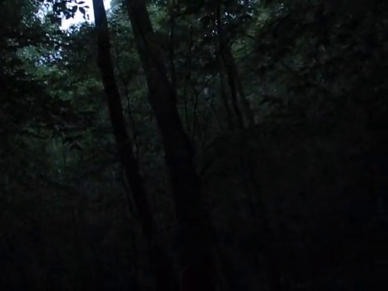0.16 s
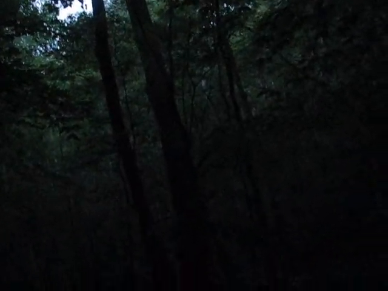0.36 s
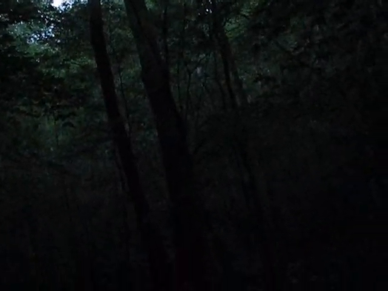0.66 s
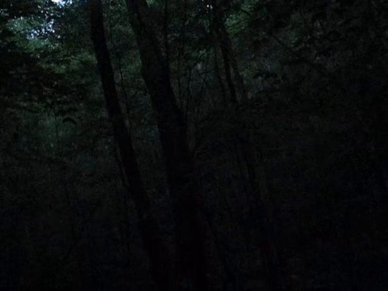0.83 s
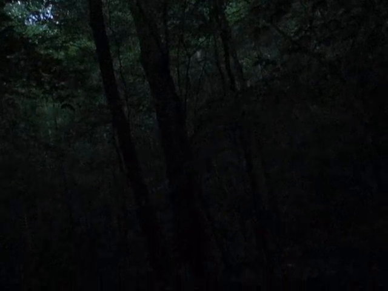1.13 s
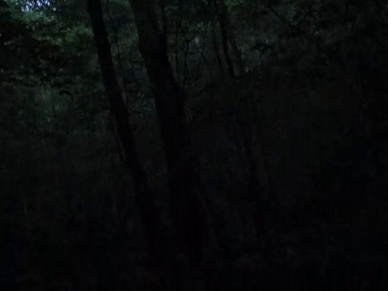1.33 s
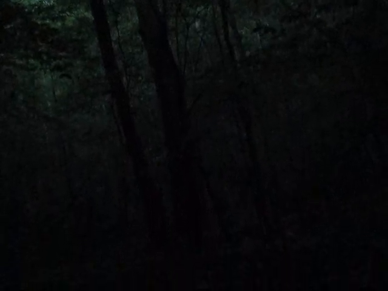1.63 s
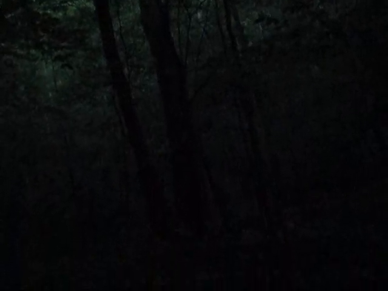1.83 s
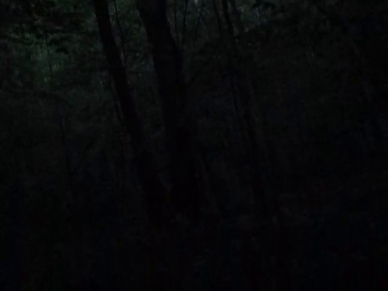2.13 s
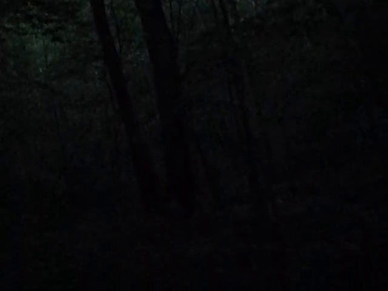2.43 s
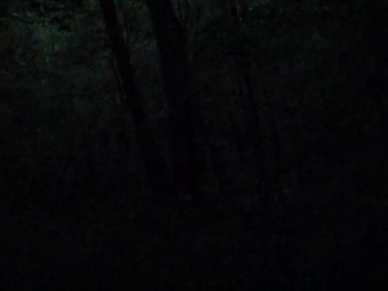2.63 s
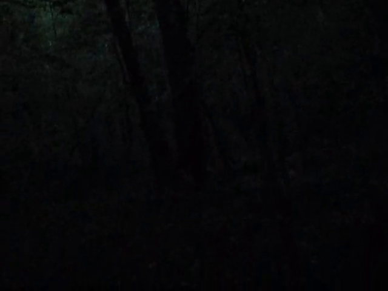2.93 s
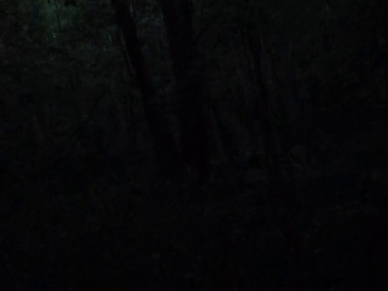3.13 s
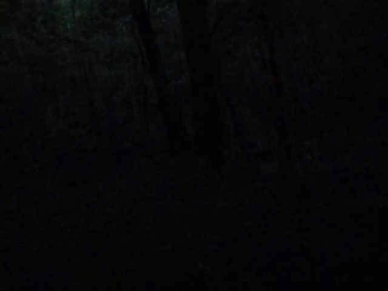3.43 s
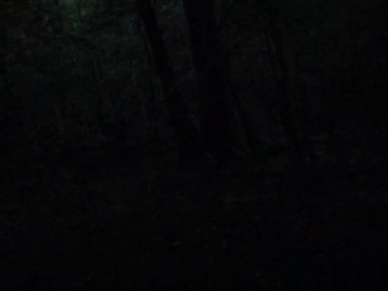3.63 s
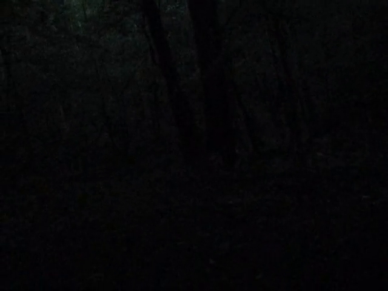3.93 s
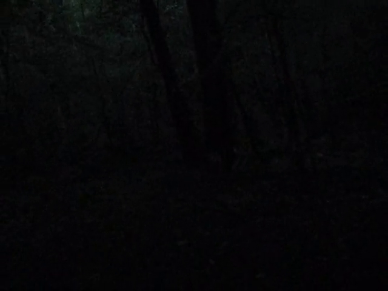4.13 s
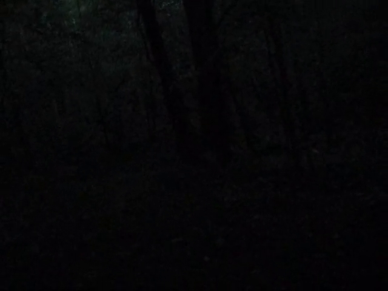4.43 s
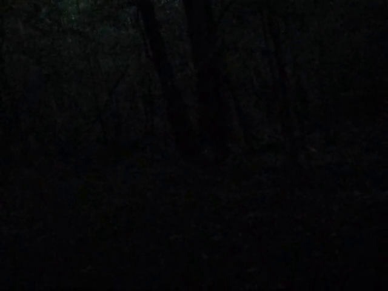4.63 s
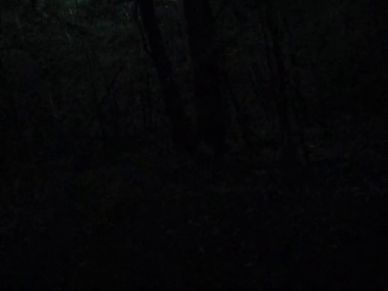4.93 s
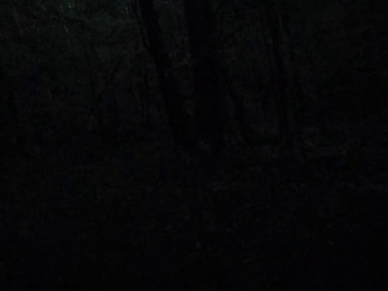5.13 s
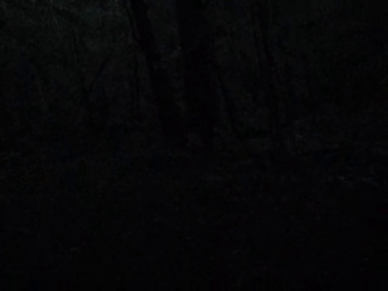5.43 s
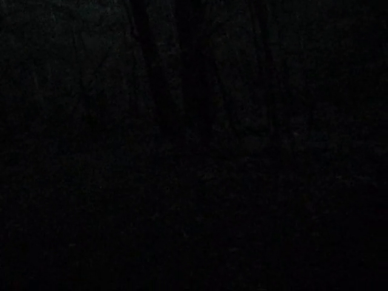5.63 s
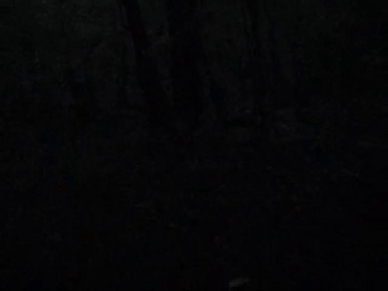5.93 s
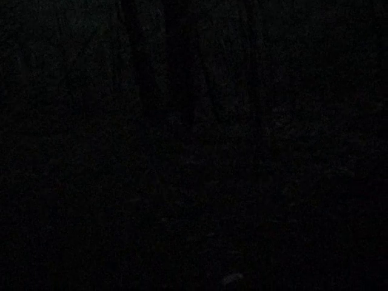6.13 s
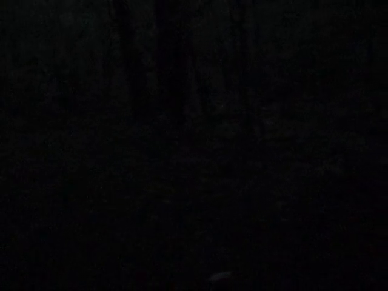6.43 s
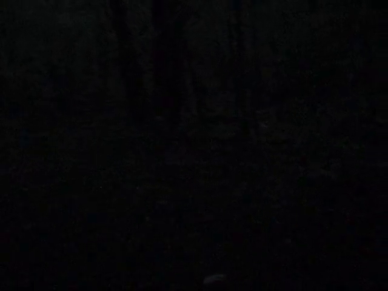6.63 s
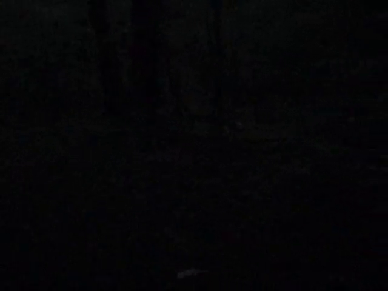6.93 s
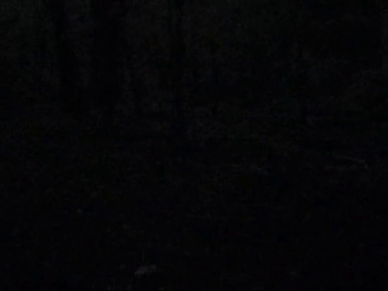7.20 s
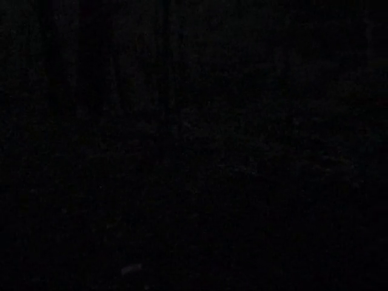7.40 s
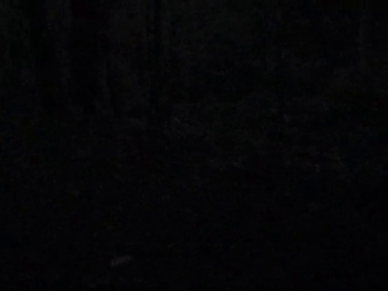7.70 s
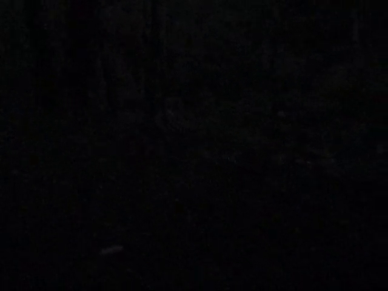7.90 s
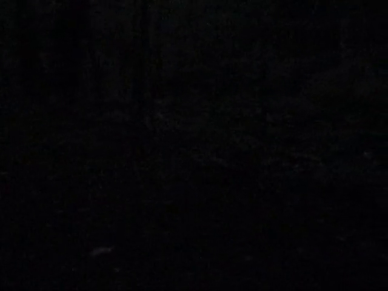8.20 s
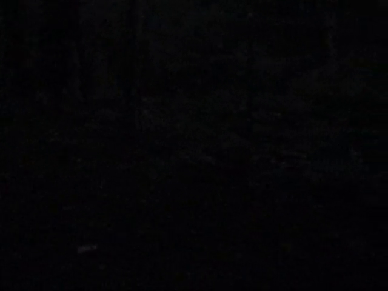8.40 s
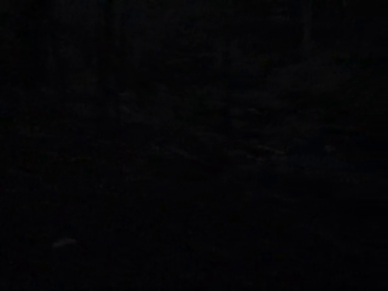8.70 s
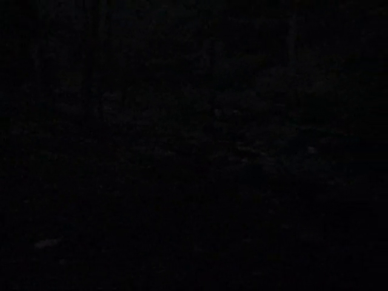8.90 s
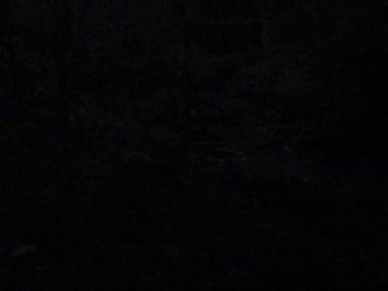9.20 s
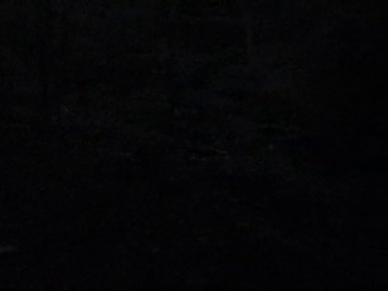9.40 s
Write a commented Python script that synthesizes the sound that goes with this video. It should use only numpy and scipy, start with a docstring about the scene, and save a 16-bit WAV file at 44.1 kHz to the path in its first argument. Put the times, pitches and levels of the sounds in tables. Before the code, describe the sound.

A steady, soft brook hiss fills a dark forest. Nearby, a clear whistling bird and a rougher, burry one exchange very short gliding phrases, smeared by long woodland echoes. A faint high whistle comes from a distant bird. Low gurgles and a few bubble plops surface in the water; leaves crackle briefly later on. The stereo microphone adds a faint steady whine and dull extreme treble.

```python
"""Dawn forest beside a brook

A clear whistler and a burry singer, gliding sines with and without a warble, trade short phrases
that smear among the trunks; a thin far bird whistles above them. The brook rushes as smooth noise
and gurgles as ringing air pockets, leaves rustle in bursts of crackly noise, and a thin, wandering
narrow band of high hiss lies to the left. The microphone electronics add a faint whine of steady sines."""
import sys
import numpy as np
from scipy import signal
from scipy.fft import rfft, irfft, next_fast_len
from scipy.io import wavfile
from scipy.ndimage import uniform_filter1d

SR = 44100
rng = np.random.default_rng(int(sys.argv[2]) if len(sys.argv) > 2 else 0)


def wrap_up_sound(samples):
    """Save the sound to the file named by the first command line argument, as 16-bit audio."""
    columns = np.atleast_2d(samples).T
    # keep every value between -1 and 1, then stretch to whole-number steps
    tamed = np.clip(columns, -1, 1)
    steps = np.round(tamed * 32767).astype(np.int16)
    wavfile.write(sys.argv[1], SR, steps)


N = 421155
TIME = np.arange(N) / SR
PADDED = next_fast_len(N + 2 * SR)  # room for two seconds of echo
BINS_HZ = np.fft.rfftfreq(PADDED, 1 / SR)
PORT_LAG_S = 5.5e-5  # sound reaches the left port this much later than the right

# The near singers carry best in mid range. Each row: frequency in Hz, gain in dB.
THROAT = [(2000, -0.5), (2500, -2.2), (3000, 2.2), (3500, -0.75), (4300, -1)]
# Air pockets under stones in the brook. Each row: pitch in Hz, relative level in dB, t60 in seconds.
AIR_POCKETS = [(323.4, -10, 0.22), (351, -1.5, 0.08), (392.5, -1.5, 0.12), (470.6, -8.5, 0.17)]


def from_db(db):
    """Decibels to gain."""
    return 10 ** (np.asarray(db) / 20)


def rms_one(x):
    """Scale to unit rms."""
    return x / np.sqrt(np.mean(x ** 2) + 1e-20)


def at_hz(points, hz):
    """Columns of a table read on a log-frequency axis."""
    first, *columns = np.transpose(points)
    log_hz = np.log(np.maximum(hz, 1))
    return [np.interp(log_hz, np.log(first), column) for column in columns]


def over_time(points):
    """A table of seconds and values, read at every sample."""
    return np.interp(TIME, *np.transpose(points))


def drift(corner_hz):
    """Slow random wander of unit rms: noise through two equal low-pass poles, at every 40th sample."""
    r = np.exp(-2 * np.pi * corner_hz * 40 / SR)
    noise = rng.standard_normal(N // 40 + 2002)
    slow = signal.lfilter([1], [1, -2 * r, r * r], noise)[2000:]  # skip the filter's start
    return np.interp(np.arange(N) / 40, np.arange(len(slow)), rms_one(slow))


def band(x, order, low_hz, high_hz):
    """Keep what lies between two frequencies."""
    return signal.sosfilt(signal.butter(order, [low_hz, high_hz], "band", fs=SR, output="sos"), x)


def at_ports(x, pan_db):
    """A source heard at both ports: left minus right level in dB, and a small lag at the left."""
    lagged = np.interp(TIME - PORT_LAG_S, TIME, x)
    return np.array([lagged, x]) * from_db([[pan_db / 2], [-pan_db / 2]])


def sing(notes, throat, arch_db, edge_s, waver_hz):
    """Each syllable is a sine on a smooth pitch contour, arched in level; swing columns warble it.

    Gives the direct and the scattered share; the ends lie arch_db under the middle.
    """
    warble_per_s, warble_slip_rad = 76, .9  # the warble keeps uneven time
    out = np.zeros((2, N))
    waver = waver_hz * drift(43.5)
    slip = warble_slip_rad * drift(24.95)
    for start, to_turn, after, first_hz, turn_hz, last_hz, level_db, growth_db, facing_db, *swing in notes:
        turn, end = start + to_turn, start + to_turn + after
        span = slice(int(start * SR), int(end * SR) + 1)
        t, corners = TIME[span], [start, turn, end]
        glide = uniform_filter1d(np.interp(t, corners, [first_hz, turn_hz, last_hz]), size=300)
        pitch = glide + waver[span]
        if swing:
            warble = np.sin(2 * np.pi * warble_per_s * (t - start) + slip[span])
            pitch += np.interp(t, corners, swing) * warble
        way = 2 * (t - start) / (end - start) - 1  # -1 at the start, 1 at the end
        db = level_db + growth_db * way / 2 - arch_db * way ** 2 + at_hz(throat, glide)[0]
        edges = np.clip(np.minimum(t - start, end - t) / edge_s, 0, 1)
        note = np.sqrt(2) * from_db(db) * edges * np.sin(2 * np.pi * np.cumsum(pitch) / SR)
        out[:, span] += note * [[from_db(facing_db)], [1]]
    return out


def in_woods(song, pan_db, near_t60, near_db, far_t60, far_db, alike):
    """Direct sound plus countless echoes from near and far trunks: dying noise as impulse response.

    The t60s are in seconds; alike is the share of echo power common to left and right.
    """
    # Leaves and twigs scatter high notes better. Each row: frequency in Hz, echo gain in dB.
    scatter = [(2000, -5), (2600, 0.5), (3200, -0.4), (4200, 1.9)]
    leaf_stir, leaf_stir_hz = .35, 60  # moving leaves make the echoes flutter: depth, rate
    build_s = .005  # first echoes arrive within milliseconds
    t = TIME[:2 * SR]
    near = from_db(-60 * t / near_t60) ** 2
    far = from_db(-60 * t / far_t60) ** 2
    power = from_db(2 * near_db) * near / np.sum(near) + from_db(2 * far_db) * far / np.sum(far)
    envelope = np.sqrt(power) * (1 - np.exp(-t / build_s))
    shared, left, right = rng.standard_normal((3, len(t))) * envelope
    echoes = np.sqrt(alike) * shared + np.sqrt(1 - alike) * np.array([left, right])
    direct, scattered = song
    scattered = scattered * rms_one(1 + leaf_stir * drift(leaf_stir_hz))
    colour = from_db(at_hz(scatter, BINS_HZ))
    wet = rfft(at_ports(scattered, pan_db), PADDED) * rfft(echoes, PADDED) * colour
    return at_ports(direct, pan_db) + irfft(wet, PADDED)[:, :N]


def clear_singer():
    """Pure whistled syllables gliding to a turning pitch and on to a last one."""
    # Each row: start in seconds, seconds to the turn, seconds after it, first, turn and last pitch in Hz,
    # mid-syllable rms level in dB before the throat, growth over the syllable in dB,
    # facing (direct over scattered share) in dB.
    notes = [ (.735, 0.047, 0.0056, 3500, 4380, 4350, -51, 5, 1),
             (.783, 0.0078, 0.013, 4350, 3596, 3060, -35.5, 0, -0.5),
             (1.272, 0.069, 0.027, 2410, 3142, 2780, -37, 6, 0),
             (1.375, 0.041, 0.061, 2750, 2330, 2895, -45, -2.5, -2),
             (1.89, .05, .045, 2000, 2250, 3010, -49.5, 15, -2),
             (1.985, 0.024, 0.028, 3100, 2877, 2810, -37.5, -13, -2),
             (2.06, 0.031, 0.025, 2930, 2380, 2090, -42.5, -15, 2),
             (2.495, 0.031, 0.047, 3080, 2697, 2056, -39.5, -8.5, -1),
             (2.6, 0.043, 0.077, 3260, 2676, 1987, -40.5, -5, -3),
             (3.335, 0.018, 0.019, 2603, 2427, 2170, -41.5, 7, -1),
             (3.385, .018, 0.036, 2356, 2390, 2385, -41, 9, 0.5),
             (3.436, 0.027, 0.022, 2566, 2810, 3000, -41.5, -4, 1.5),
             (3.752, 0.015, 0.034, 3012, 3010, 2856, -38.5, -3, 4.5),
             (3.797, 0.029, 0.014, 2900, 3680, 3280, -44, 3, 5),
             (3.85, .021, 0.054, 3335, 3075, 2933, -41, -7, 5.5),
             (3.99, 0.051, 0.066, 2800, 2544, 2020, -45, 2, -4.5),
             (4.503, 0.034, 0.058, 3045, 2977, 3163, -40, 9, 4),
             (4.6, .03, 0.033, 3190, 3166, 2610, -37, 0, 0),
             (4.665, .035, 0.048, 2640, 2436, 2210, -42.5, -10, 1.5),
             (5.3, .035, 0.023, 2730, 2513, 2180, -41.5, -3, 0),
             (5.305, .035, 0.031, 3100, 3310, 3660, -47, 6, -3),
             (5.37, 0.018, 0.045, 3150, 3453, 2494, -37, 6, 1.7),
             (6.725, .075, 0.047, 3360, 2870, 2756, -46, -4, -6),
             (6.875, .03, 0.039, 3240, 2850, 2080, -39, -2.5, 0),
             (7.42, 0.027, 0.024, 3398, 3136, 3110, -51, 12, 3),
             (7.48, 0.011, .015, 3570, 4050, 3420, -52, 7, -5),
             (7.506, 0.017, 0.035, 3490, 3020, 2090, -48.5, -24, 1.5),
             (7.6, 0.046, 0.12, 3060, 3095, 3050, -57.5, -6, 7),
             (8.225, 0.041, 0.024, 2604, 2967, 3050, -46.5, 14, -3),
             (8.3, 0.043, .04, 2990, 3032, 3016, -49, 3, 5),
             (8.39, 0.026, .11, 2973, 3066, 3060, -61, -9, 8),
             (8.885, 0.018, .025, 3450, 3600, 3700, -51, -1, -3),
             (8.932, 0.011, 0.011, 3690, 3310, 2860, -43, -3, -2),
             (9.44, 0.0079, 0.0135, 3910, 3420, 2830, -52, -6, 4), ]
    song = sing(notes, THROAT, arch_db=1.5, edge_s=.003, waver_hz=13.7)
    return in_woods(song, -3.5, near_t60=0.33, near_db=0.8, far_t60=1.45, far_db=2.6, alike=0.45)


def burry_singer():
    """Gliding syllables whose pitch swings fast enough to sound rough."""
    # Each row: start in seconds, seconds to the turn, seconds after it, first, turn and last pitch in Hz,
    # mid-syllable rms level in dB before the throat, growth in dB, facing in dB,
    # then the warble's swing in Hz at the start, the turn and the end.
    notes = [ (.218, 0.057, 0.018, 2630, 2940, 2570, -43, 4, 4, 250, 340, 60),
             (.295, 0.031, 0.067, 2590, 2350, 2294, -42.5, -6, 5, 40, 18, 18),
             (.81, 0.075, 0.077, 3500, 3533, 3560, -45, 0, 5, 406, 430, 370),
             (1.865, 0.036, 0.088, 2750, 4220, 3145, -37.5, 4.5, -4.5, 100, 290, 64),
             (2.525, .04, 0.078, 3300, 3760, 3400, -46.5, -5, -8, 100, 190, 230),
             (2.62, 0.038, 0.031, 3420, 3098, 3010, -40.5, -9, -14, 201, 160, 150),
             (3.155, .025, 0.032, 3125, 2870, 2846, -47.5, 5, -2, 150, 270, 230),
             (3.22, .045, 0.052, 3100, 3326, 2910, -46.5, 10, -18, 200.5, 220, 350),
             (3.8, 0.036, 0.058, 3000, 3530, 3350, -43, -8, -1, 120, 155, 200),
             (5.48, .03, .09, 3024, 3870, 2954, -46, 3, 1, 120, 220, 150),
             (6.075, .046, .044, 2550, 2840, 4200, -45.5, 24, -2.5, 80, 100, 410),
             (6.165, .08, 0.08, 4150, 2985, 2686, -40.5, -12.5, 0, 302, 130, 40),
             (6.18, .04, 0.032, 2900, 2700, 2390, -48, 1, 0, 100, 130, 160),
             (6.89, 0.048, 0.089, 3280, 3660, 3060, -49, 11, -1, 150, 230, 140),
             (6.985, 0.023, 0.044, 2784, 2820, 2770, -41, -2, 4, 90, 120, 130),
             (7.56, 0.045, 0.043, 2500, 3510, 3312, -48, -9, -12, 258, 300, 320),
             (8.35, .07, 0.077, 2300, 3116, 3250, -51, 1.5, -1, 101, 420, 340),
             (8.97, .07, .08, 3430, 3413, 3620, -50, 1.5, 3.5, 380, 500, 150), ]
    song = sing(notes, THROAT, arch_db=2.5, edge_s=0.0023, waver_hz=12)
    return in_woods(song, -1.5, near_t60=0.36, near_db=0.29, far_t60=1.4, far_db=2.3, alike=0.32)


def thin_whistles():
    """A far bird's faint gliding sines, with no throat colour."""
    # Each row: start in seconds, seconds to the turn, seconds after it, first, turn and last pitch in Hz,
    # mid-syllable rms level in dB, growth in dB, facing in dB.
    notes = [ (2.68, .14, 0.303, 6940, 6250, 6160, -60.5, -7, -4),
             (3.07, 0.15, 0.38, 4000, 3960, 3880, -62, 0, -.7),
             (3.5, .06, 0.26, 6400, 6180, 6140, -57.5, -11, 0),
             (6.05, .11, 0.042, 6220, 6280, 6300, -59, -6, -5),
             (9.09, 0.17, 0.13, 6020, 6420, 6430, -57.5, 1.5, -7), ]
    song = sing(notes, [(1, 0)], arch_db=1.5, edge_s=0.01, waver_hz=19)
    return in_woods(song, 4, near_t60=0.26, near_db=0.22, far_t60=0.81, far_db=1.8, alike=0.16)


def rush():
    """The brook's far hiss: smooth noise, partly common to both ports, swelling a little."""
    # Spectrum of the rush. Each row: frequency in Hz, density in dB per Hz.
    spectrum = [(15, -125), (25, -114), (50, -103), (100, -95.5), (200, -94.5), (330, -90.5), (600, -90),
                (1000, -89), (1600, -88), (2300, -84.5), (3000, -84), (4000, -86.5), (5500, -88.5),
                (7200, -86.5)]
    # The rush between the ports. Each row: frequency in Hz, likeness 0-1, left minus right in dB.
    image = [(60, 0.56, -0.7), (300, 0.53, -1), (1190, 0.47, -0.5), (3000, 0.51, -4.5), (5000, 0.54, 1.5),
             (9600, 0, 0.2), (12800, 0, 4.5)]
    # Gain of the highest treble. Each row: time in seconds, gain in dB.
    treble = [(0, -.5), (5.5, 0), (8.2, 1), (8.7, 3), (9.55, 1.5)]
    treble_from_hz = 10500
    shared, left, right = rfft(rng.standard_normal((3, PADDED)))
    alike, pan_db = at_hz(image, BINS_HZ)
    lagged = shared * np.exp(-2j * np.pi * BINS_HZ * PORT_LAG_S)
    pair = np.sqrt(alike) * np.array([lagged, shared]) + np.sqrt(1 - alike) * np.array([left, right])
    pair *= from_db(at_hz(spectrum, BINS_HZ) + np.array([pan_db / 2, -pan_db / 2]))
    pair *= np.sqrt(SR / 2)  # density per Hz to sample level
    top = irfft(pair * (BINS_HZ > treble_from_hz), PADDED)[:, :N]
    body = irfft(pair * (BINS_HZ <= treble_from_hz), PADDED)[:, :N]
    return from_db(0.3 * drift(2.4)) * (body + top * from_db(over_time(treble)))


def ring(clicks, hz, t60):
    """A resonator: a unit click sets a dying sine of height 1 ringing."""
    r, w = from_db(-60 / (t60 * SR)), 2 * np.pi * hz / SR
    return signal.lfilter([0, np.sin(w)], [1, -2 * r * np.cos(w), r * r], clicks + 1e-18)


def gurgle():
    """Random gulps of water excite the air pockets, each ringing through two resonators in a row."""
    # How strongly the water gurgles. Each row: time in seconds, level in dB.
    flow = [(0, -66), (1.1, -67.5), (1.9, -63), (2.6, -67), (3.5, -68), (5.0, -65), (6.2, -65),
            (7.1, -63.5), (8.1, -64), (9.55, -67.5)]
    gulps_per_s = 80
    out = np.zeros(N)
    for hz, level_db, t60 in AIR_POCKETS:
        gulps = rng.standard_normal(N) * (rng.random(N) < gulps_per_s / SR)
        out += from_db(level_db) * rms_one(ring(ring(gulps, hz, t60), hz, t60 / 2))
    return from_db(over_time(flow)) * rms_one(out)


def glugs():
    """A regular run of big gulps: soft bursts of noise push the air pockets."""
    start_s, gap_s, count = 1.1, .0995, 7
    push_db, uneven_db = -54, 2.5  # drive before the filter; every other gulp is weaker
    pushes = np.zeros(N)
    for k in range(count):
        burst = np.hanning(400) * rng.standard_normal(400) / 12  # about unit energy
        pushes[int((start_s + k * gap_s) * SR):][:400] += from_db(push_db - uneven_db * (k % 2)) * burst
    pushes = band(pushes + 1e-18, 3, 300, 480)  # a soft push, no thump or tick
    return sum(from_db(level_db) * ring(pushes, hz, t60) for hz, level_db, t60 in AIR_POCKETS)


def plops():
    """Lone bubbles: short sines that rise in pitch as they swell and die."""
    # Each row: start in seconds, envelope peak in dB before panning, starting pitch in Hz.
    bubbles = [(4.23, -51, 650), (7.153, -49.5, 1000), (7.165, -45.5, 770), (7.185, -50, 720),
               (8.74, -53, 723)]
    out = np.zeros(N)
    t = TIME[:SR // 10]
    envelope = 300 * t * np.exp(1 - 300 * t)  # peaks at 1 after 1/300 s
    for start, peak_db, hz in bubbles:
        tone = np.sin(2 * np.pi * hz * t * (1 + 4.3 * t))
        out[int(start * SR):][:len(t)] += from_db(peak_db) * envelope * tone
    return out


def rustles():
    """Brief bright bursts of crackly noise from stirred leaves."""
    # Each row: start in seconds, length in seconds, level at the middle in dB.
    bursts = [(5.5, .03, -66), (6.331, 0.097, -53), (6.435, 0.056, -47), (7.817, 0.062, -45.5),
              (8.49, 0.039, -49), (9.435, .04, -48)]
    level = sum(from_db(db) * np.sin(np.pi * np.clip((TIME - start) / length, 0, 1))
                for start, length, db in bursts)
    crackle = rng.standard_normal((2, N)) * from_db(4.0 * drift(150))
    return level * rms_one(band(crackle, 2, 3500, 10500))


def high_hiss():
    """A thin, narrow band of noise to the left, whose centre wanders and whose level wavers."""
    # Each row: time in seconds, centre in Hz, level at the left in dB.
    hiss_band = [(0, 10340, -52), (1.7, 10100, -55), (2.4, 10080, -50), (2.55, 9950, -58),
                 (3.7, 10090, -54), (3.85, 10140, -53), (4.5, 10150, -54), (4.9, 10250, -69),
                 (5.3, 9880, -54), (5.6, 10200, -61), (5.8, 10200, -55), (6.1, 10350, -62),
                 (6.75, 10400, -59), (6.85, 9900, -50), (7.05, 10100, -54), (7.2, 10300, -63),
                 (9.55, 10300, -58)]
    half_width_hz, waver_db, right_db = 100, 1.5, -21
    s, hz, level_db = np.transpose(hiss_band)
    turning = np.exp(2j * np.pi * np.cumsum(np.interp(TIME, s, hz)) / SR)
    low_pass = signal.butter(2, half_width_hz, fs=SR, output="sos")
    slow = signal.sosfilt(low_pass, rng.standard_normal((2, N)))
    hiss = rms_one(np.real((slow[0] + 1j * slow[1]) * turning))
    level = from_db(np.interp(TIME, s, level_db) + waver_db * drift(5.0))
    return hiss * level * from_db([[0], [right_db]])


def scene():
    """Birds in the woods over the brook, with rustling leaves and a thin high hiss."""
    birds = clear_singer() + burry_singer() + thin_whistles()
    brook = rush() + at_ports(gurgle() + glugs() + plops(), pan_db=3.0)
    return birds + brook + rustles() + high_hiss()


def whine():
    """Steady sines leaking from the electronics, out of step between the channels."""
    # Multiples of 30 Hz. Each row: frequency in Hz, rms level in the right channel in dB.
    leaks = [(8190, -79), (8220, -72), (8250, -61.5), (8280, -61.5), (8310, -72), (8340, -76), (8370, -80)]
    left_db, left_lead_rad = -4.7, 2.12
    tones = sum(from_db(db) * np.exp(2j * np.pi * (hz * TIME + rng.random())) for hz, db in leaks)
    return np.sqrt(2) * np.real(tones * [[from_db(left_db) * np.exp(1j * left_lead_rad)], [1]])


def record(dry):
    """Each microphone port colours the treble; the electronics add their whine; the top is cut."""
    # Treble response of each port in the housing. Each row: frequency in Hz, gain in dB.
    left_port = [(7100, -0.5), (8000, -2.5), (8900, -9.5), (9400, -26), (9650, -18), (9900, -10.5),
                 (10450, -12.5), (10750, -22), (11600, -20.5), (12500, -19), (13000, -16)]
    right_port = [(8500, 0.5), (9400, -1.5), (10200, -5.5), (11000, -11.5), (11500, -16.5), (13000, -30)]
    cutoff_hz = 13250  # 60 dB down from here up
    ports = from_db(at_hz(left_port, BINS_HZ) + at_hz(right_port, BINS_HZ))
    heard = irfft(rfft(dry, PADDED) * ports, PADDED)[:, :N]
    top_cut = signal.cheby2(26, 60, cutoff_hz, fs=SR, output="sos")
    return signal.sosfilt(top_cut, heard + whine())


dry = scene()
out = record(dry)
wrap_up_sound(out)
```